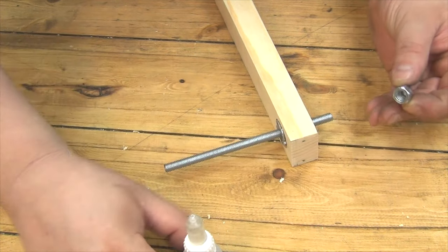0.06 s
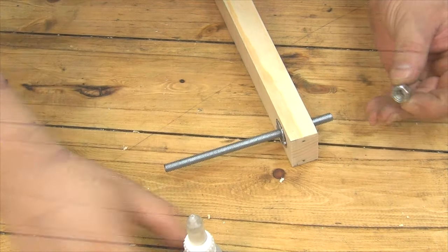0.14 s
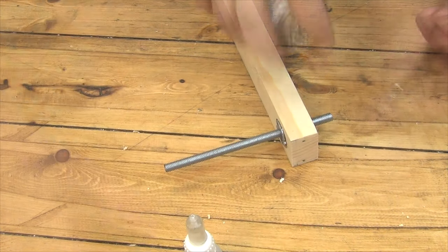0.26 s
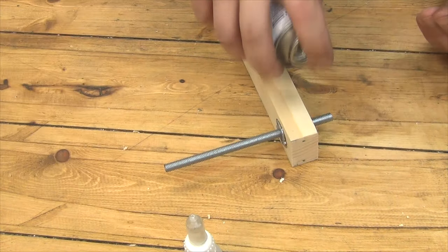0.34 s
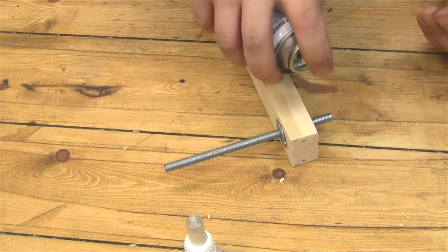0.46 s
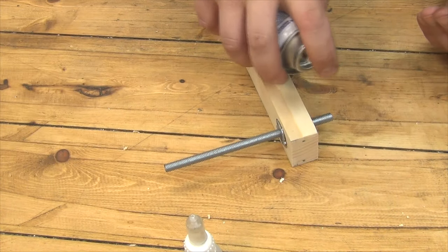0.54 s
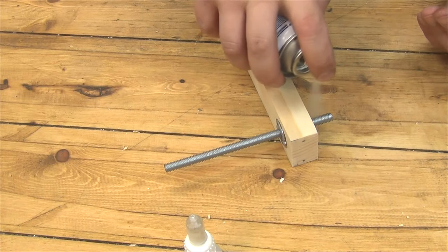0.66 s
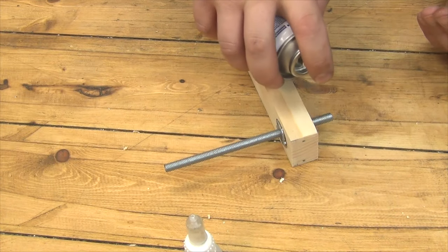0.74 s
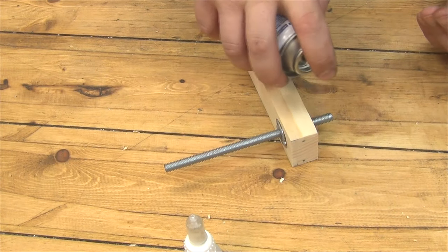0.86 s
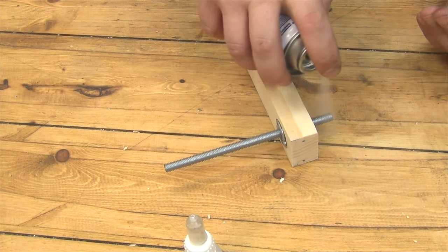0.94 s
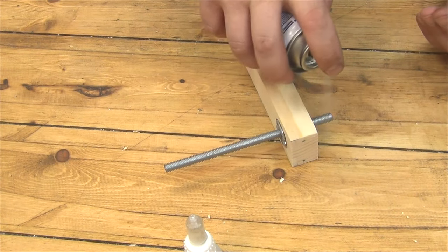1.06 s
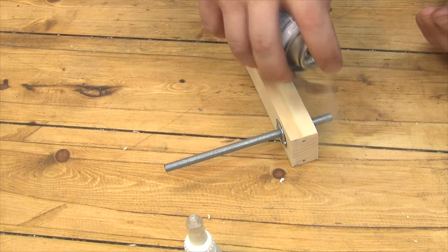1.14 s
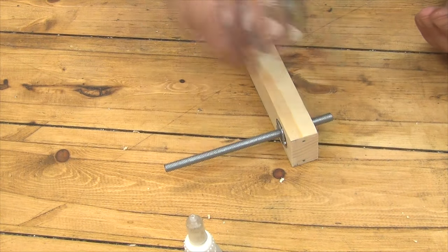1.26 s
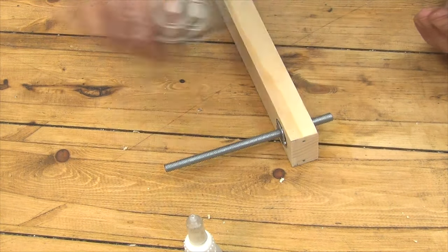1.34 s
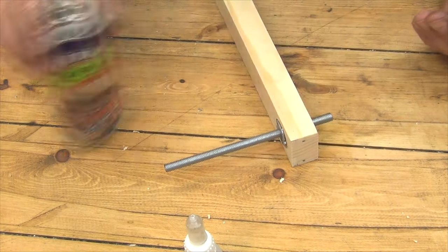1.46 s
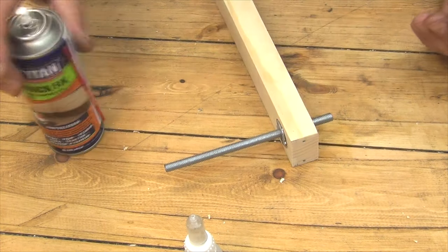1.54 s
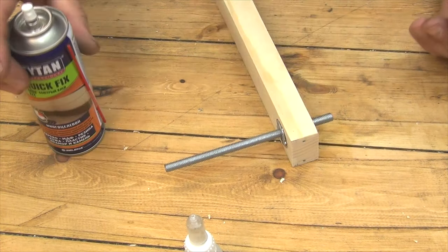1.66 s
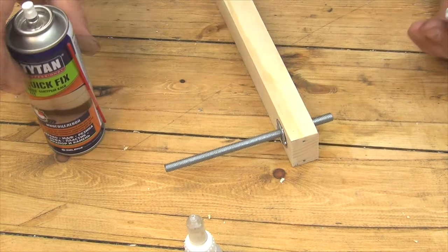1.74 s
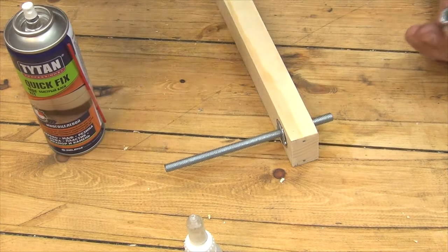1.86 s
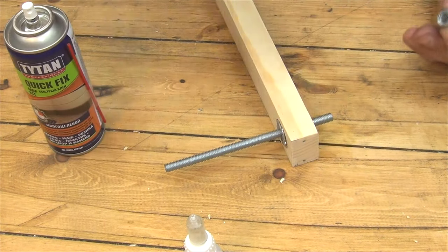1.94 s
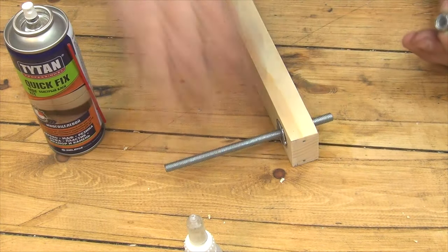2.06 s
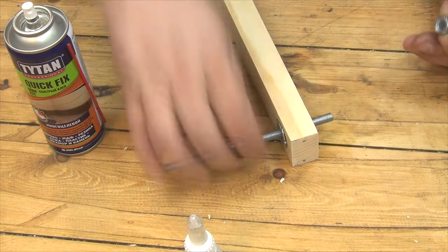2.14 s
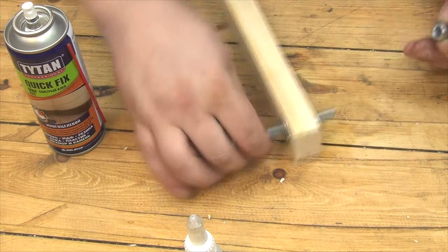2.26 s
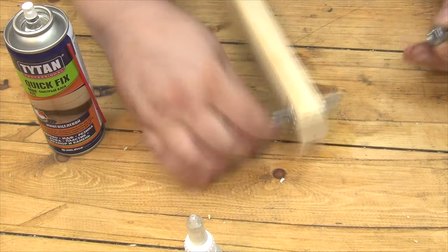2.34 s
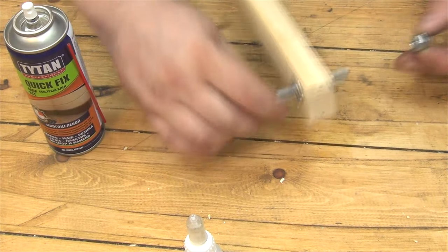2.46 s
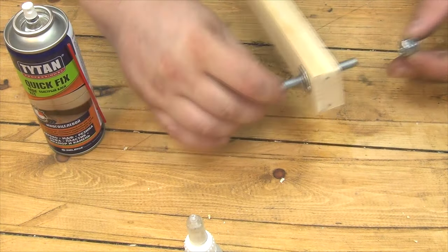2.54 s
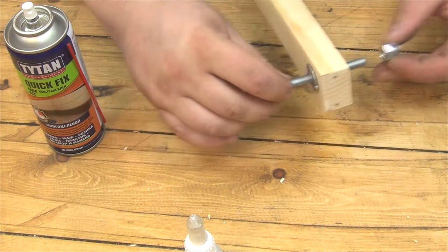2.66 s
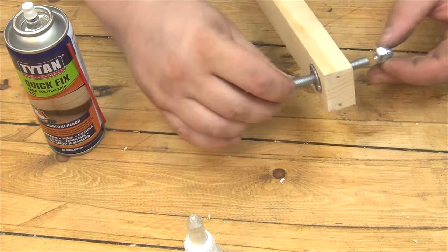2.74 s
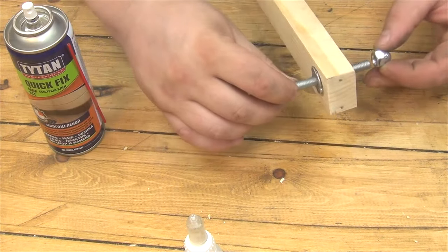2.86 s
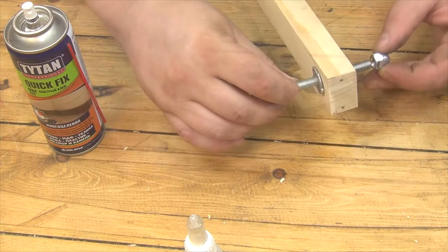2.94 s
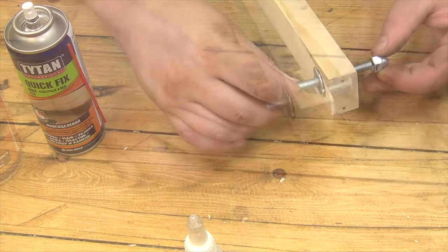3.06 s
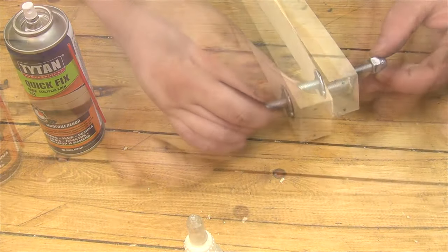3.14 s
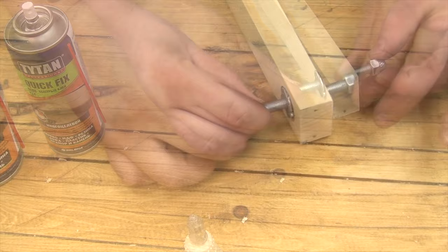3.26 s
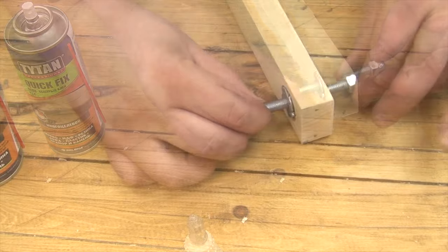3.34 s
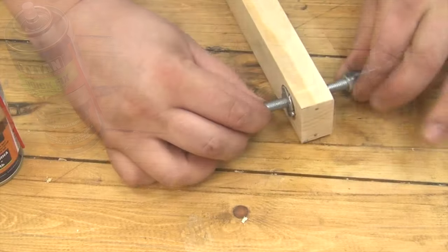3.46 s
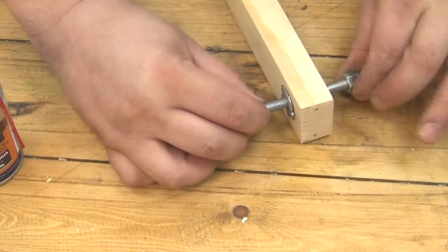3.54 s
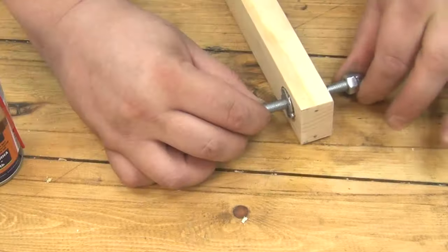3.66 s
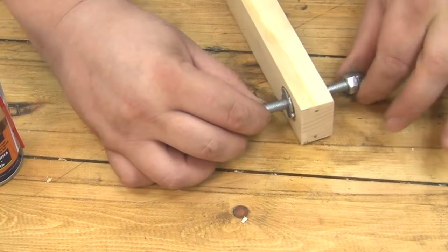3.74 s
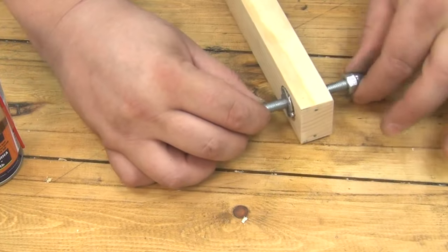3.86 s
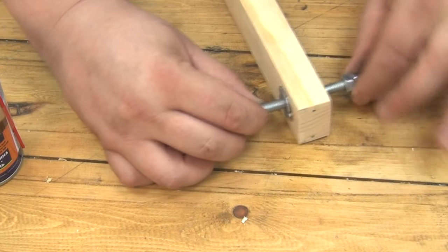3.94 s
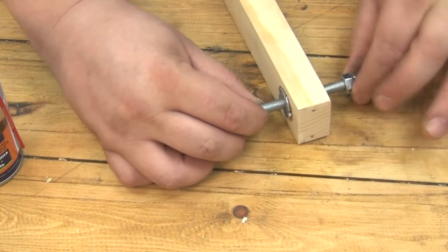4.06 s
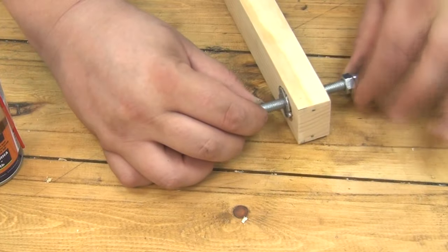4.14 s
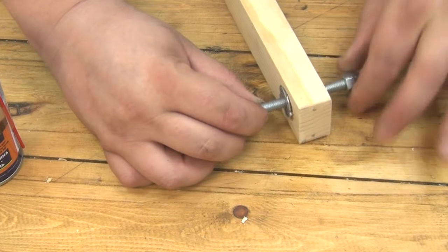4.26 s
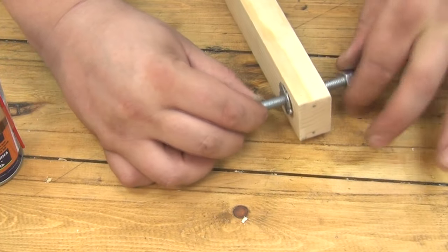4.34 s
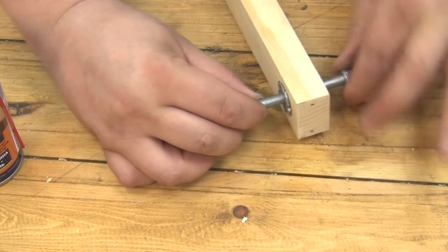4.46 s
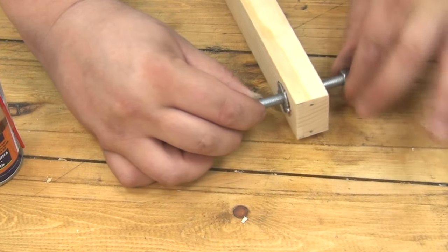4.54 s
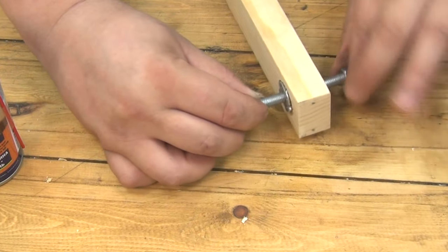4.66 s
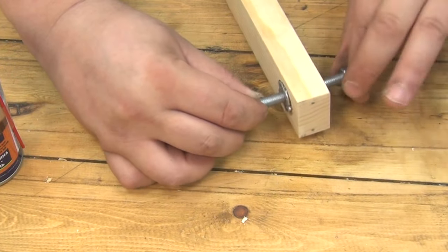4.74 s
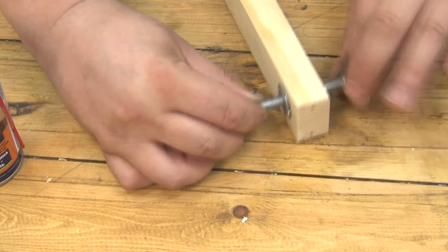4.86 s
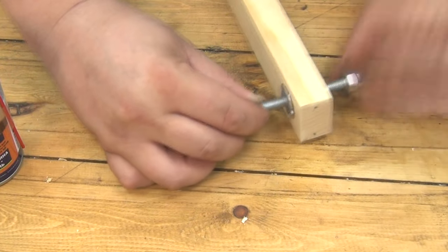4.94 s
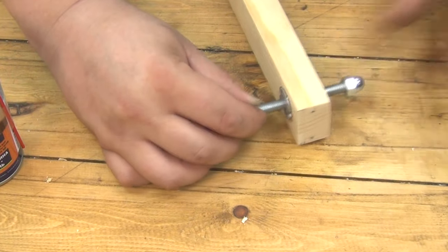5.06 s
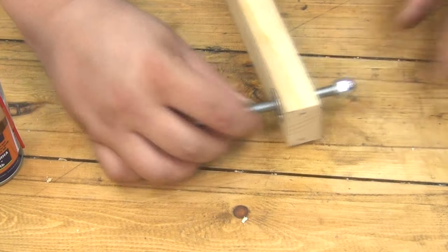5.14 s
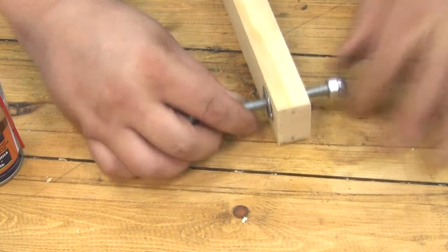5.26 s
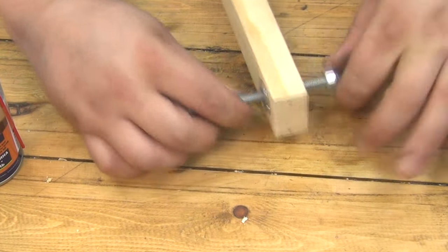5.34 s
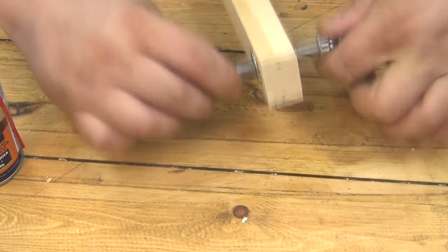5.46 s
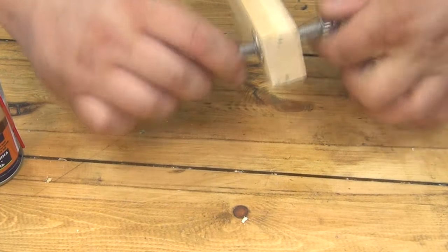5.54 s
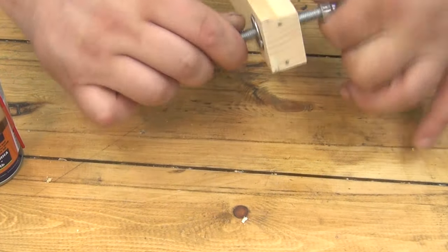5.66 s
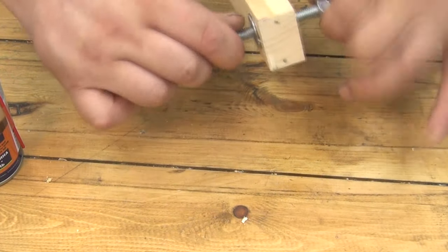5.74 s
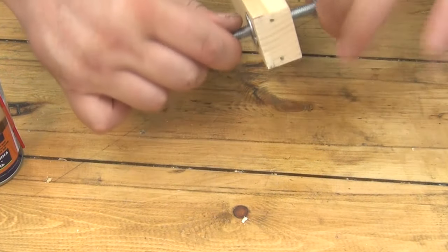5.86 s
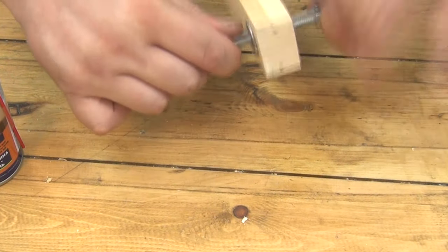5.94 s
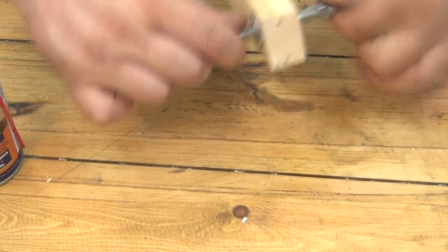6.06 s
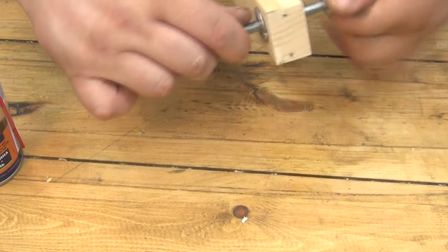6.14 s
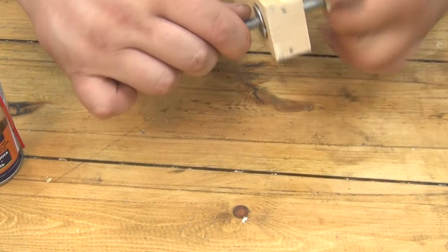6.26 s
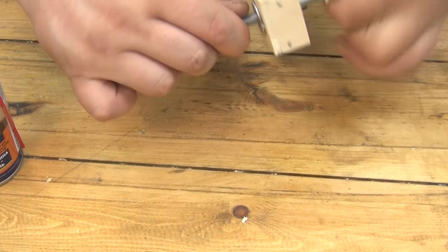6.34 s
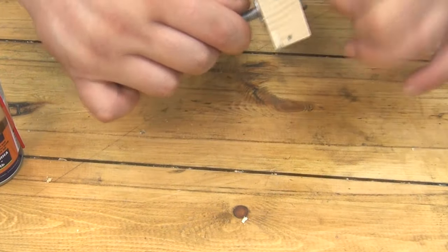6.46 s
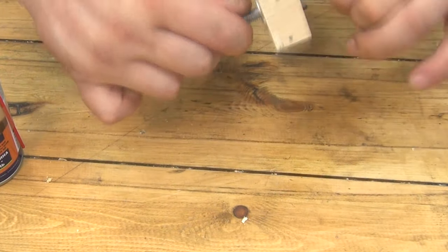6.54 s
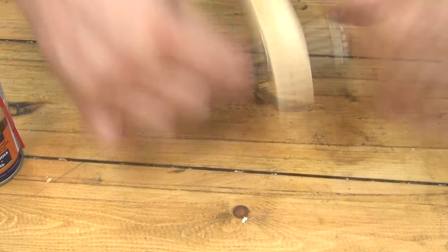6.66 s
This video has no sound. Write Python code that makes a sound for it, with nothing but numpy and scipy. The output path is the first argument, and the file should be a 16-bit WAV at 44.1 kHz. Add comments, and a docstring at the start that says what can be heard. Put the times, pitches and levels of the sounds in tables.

```python
"""A faint rustle of hands is heard first, then three short sprays of an aerosol can onto a wooden batten: turbulent
hiss, shaped by nozzle resonances and combed by a reflection. The can is set down on a plank floor and rocks: decaying
modes of can and boards. Fingers start a nut on the threaded rod in the batten: micro-impacts tick on steel, friction
noise rubs and squeaks, the batten knocks and loose washers chatter. A small dry room adds a short tail; a fan runs
faintly and a low hum comes and goes."""
import sys
import numpy as np
from scipy import signal
from scipy.fft import rfft, irfft, next_fast_len
from scipy.io import wavfile

SR = 44100
rng = np.random.default_rng(int(sys.argv[2]) if len(sys.argv) > 2 else 0)


def waveform_to_disk(signal):
    """Save audio, clipped to [-1, 1], as 16-bit WAV at the path in sys.argv[1]."""
    frames = np.transpose(np.atleast_2d(signal))
    scaled = np.clip(frames, -1, 1) * 32767
    samples = np.round(scaled).astype(np.int16)
    wavfile.write(sys.argv[1], SR, samples)


N = 295029
T = np.arange(N) / SR  # s
FREQ = np.arange(N // 2 + 1) * SR / N + 1e-6  # Hz, kept above zero for the logarithm

# valve presses: (t/s, length/s, level/dB, lag of the reflection off the batten/ms, reflection strength 0-1)
SPRAYS = [(0.432, .13, -50, 0.33, 0.4), (0.456, 0.036, -51, 0.33, 0.4), (0.648, 0.021, -23.5, 0.34, 0.08),
          (0.674, 0.11, -22.5, 0.33, 0.1), (0.922, 0.13, -22, 0.363, 0.25),
          (1.105, 0.095, -22.5, 0.37, 0.16)]
# spectrum of the jet's hiss: (f/Hz, relative level/dB)
JET_SPECTRUM = [(100, -39), (350, -25.5), (700, -21), (1100, -28.5), (2000, -21), (3000, -14), (4200, -19),
                (6500, -13), (7400, -1.5), (8200, -2.5), (9000, -6), (10300, -1.5), (11500, -10),
                (15800, -9)]
# narrow whistles of the nozzle: (f/Hz, width/Hz, level above the hiss/dB)
NOZZLE_WHISTLES = [(4800, 380, 5.5), (6000, 83, 4), (7180, 50, 4.5), (7660, 21, -0.5), (8060, 30, -0.5),
                   (8420, 55, 3.5), (8100, 50, 8), (9400, 22, 0), (8980, 37, 0), (9300, 30, 5),
                   (10300, 25, 0), (10400, 21, 5), (10530, 25, 0.5)]


def spray(attack_s=0.017, close_t60=0.075, flutter_db=1.14, scatter=0.13, lead_s=0.0071, dull_hz=9500,
          half_open_db=-40):
    """Jet noise and comb filtering: turbulence hisses while the valve is open and meets its own reflection."""
    whistles = abs(peaks(NOZZLE_WHISTLES))
    jet = filtered(noise(), slope(JET_SPECTRUM) * np.sqrt(1 + whistles ** 2))
    # hand, can and floor scatter the jet over a few ms and ripple its spectrum
    lags = rng.uniform(.001, .014, 14)
    treble = jet - lowpass(jet, 2500, order=1)  # small things throw back only short waves
    jet = jet + scatter * sum(np.roll(treble, int(lag * SR)) for lag in lags)
    # droplets make the flow uneven
    flutter = undb(flutter_db * unit(lowpass(noise(), 150)))
    jet = unit(jet) * flutter
    out, t = np.zeros(N), T[:SR // 2]
    hz = np.arange(len(t) // 2 + 1) * SR / len(t)
    for at, length, db, lag_ms, reflection in SPRAYS:
        hiss = jet[int(at * SR):][:len(t)]
        if db < half_open_db:  # a barely open valve gives a duller jet
            hiss = lowpass(hiss, dull_hz, order=1)
        delay = np.exp(-2j * np.pi * hz * lag_ms / 1000)
        echo = irfft(rfft(hiss) * delay, len(t))
        valve = np.clip(t / attack_s, 0, 1) * fade(np.maximum(t - length, 0), close_t60)
        # the flow sets in shortly before the tabled time
        add(out, at - lead_s, undb(db) * valve * unit(hiss + reflection * echo))
    return out


# body of the can: (f/Hz, relative level/dB, t60/s)
CAN_MODES = [(497, 0, 0.187), (522, -3, 0.17), (579, -0.5, 0.18), (760, -20, .12), (783, 3.5, 0.073),
             (882, -2, 0.096), (1002, 2.5, 0.096), (1096, -5, 0.088), (1267, 7, 0.042), (1280, -11, 0.13),
             (1610, -9.5, 0.094), (1844, -10, 0.077)]
CAN_AT_S, CAN_DB, CAN_ROCKING_S, RIM_GAP_S = 1.573, -27.5, 0.049, .0105


def can():
    """Modal radiation: each contact of the settling rim makes the part-full can clonk in its own modes."""
    out = np.zeros(N)
    for at, db in rocking(CAN_AT_S, CAN_DB, CAN_ROCKING_S, RIM_GAP_S):
        clonk = body(CAN_MODES, dense_db=7.5, dense_t60=0.1, low_hz=444, high_hz=1800)
        add(out, at, undb(db) * clonk)
    return out


# floorboards: (f/Hz, relative level/dB, t60/s)
BOARD_MODES = [(104.7, -11.5, 0.69), (161.5, 3.5, 0.27), (183, -9, 0.42), (208.5, 0.5, 0.22),
               (240.2, 4, 0.13), (293.8, -4, 0.26), (328, 1, 0.1), (371.5, -6, 0.18), (426, -11.5, 0.21),
               (483, -4, 0.16), (530.6, -4, 0.19), (623, 3, 0.15), (683, 6, 0.058)]
BOARD_PAN_DB, PAN_SCATTER_DB = -1, 1.5  # left minus right, and its spread from contact to contact


def boards(ring_db=-1, held_from_s=2.2, held_db=-6, thump_cycles=6, spread=2.01):
    """Contact-limited excitation: a blow thumps and rings chiefly the floorboard modes near its pitch."""
    ring = body(BOARD_MODES, dense_db=2.5, dense_t60=0.065, low_hz=172, high_hz=1170)
    out, t, start = np.zeros((2, N)), T[:len(ring)], SR // 50
    for at, db, hz in knocks():
        pan_db = BOARD_PAN_DB + PAN_SCATTER_DB * rng.standard_normal()
        # a band around the pitch of the blow shapes thump and ring
        band = signal.butter(2, [hz / spread, hz * spread], "bandpass", fs=SR, output="sos")
        thump = signal.sosfilt(band, np.sin(2 * np.pi * hz * t) * fade(t, thump_cycles / hz))
        modes = signal.sosfilt(band, ring)
        hand_db = held_db * (at > held_from_s)  # a hand on the batten weakens the ring
        modes_gain = undb(ring_db + hand_db) / np.std(modes[:start])
        blow = thump / np.std(thump[:start]) + modes_gain * modes
        blow = blow / np.std(blow[:start])
        for ear, sign in zip(out, (1, -1)):
            add(ear, at, undb(db + sign * pan_db / 2) * blow)
    return out


# a thing comes down on the boards and rocks to rest; a softer contact thumps lower:
# (t/s, level/dB, f of the first thump/Hz, rocking time/s)
LANDINGS = [(.001, -51, 380, 0.003), (1.554, -52, 165, .004), (1.576, -30, 302, 0.05),
            (1.664, -36.5, 260, 0.0049), (1.874, -52.5, 235, 0.0052), (2.416, -55.5, 313, 0.039),
            (3.273, -51, 676, 0.021), (4.345, -58.5, 198, 0.047), (4.975, -38.5, 414, 0.046),
            (5.037, -48, 720, 0.029), (5.313, -46.5, 235, 0.048), (6.138, -58.5, 268, 0.034)]
BOARD_GAP_S = .0095  # typical time between rocking contacts
FAR_EDGE_PITCH = 0.67  # every second contact is on the other edge and this much lower (ratio)
NUDGE_DB, NUDGE_HZ = 1.5, 195  # bump of the batten after a twist; level against the squeak


def knocks():
    """Repeated impact: (t/s, level/dB, f/Hz) of blows rocking edge to edge, and a bump after each twist."""
    blows = []
    for at, first_db, hz, length in LANDINGS:
        for k, (s, db) in enumerate(rocking(at, first_db, length, BOARD_GAP_S)):
            blows.append((s, db, hz * FAR_EDGE_PITCH ** (k % 2)))
    bumps = [(at + length, db + NUDGE_DB, NUDGE_HZ) for at, length, db in SQUEAKS]
    return blows + bumps


# nut and rod touch: (t/s, level/dB, contact length as t60/s)
NUT_TICKS = [(3.184, -49.5, 0.025), (3.242, -52.5, 0.017), (3.2475, -48, .012), (3.2545, -43.5, 0.025),
             (3.265, -39, 0.042)]
# resonances of the nut on the rod: (f/Hz, width/Hz, relative level/dB)
NUT_RESONANCES = [(1645, 190, 3.5), (2470, 220, 2), (2940, 1050, 3), (5500, 410, 6.5), (6800, 190, -6),
                  (7460, 200, -3)]


def nut():
    """Damped resonance: steel touches steel and rings the nut."""
    return ticks(NUT_TICKS, NUT_RESONANCES, top_hz=7960)


# fingers grab the rod: (t/s, level/dB, contact length as t60/s)
ROD_TICKS = [(2.2872, -42.5, 0.0047), (2.2897, -40.5, 0.0058), (5.101, -62, 0.009), (6.126, -56, 0.034),
             (6.178, -65, 0.0083)]
# resonances of the rod: (f/Hz, width/Hz, relative level/dB)
ROD_RESONANCES = [(1295, 240, -10.5), (2500, 740, 1.5), (6120, 2100, -3.5), (7380, 810, -1)]


def rod():
    """Damped resonance: grabbing fingers excite the rod."""
    return ticks(ROD_TICKS, ROD_RESONANCES, top_hz=9000)


# a hard landing shakes the rod and the washers hop: (t/s, level/dB, rattling time/s)
RATTLES = [(1.584, -33.5, 0.025), (4.983, -49, 0.028), (5.325, -50.5, 0.019)]
# resonances of the rattling washers, and the rod's narrow ring near 2.6 kHz:
# (f/Hz, width/Hz, relative level/dB)
RATTLE_RESONANCES = [(2590, 61, 4), (2950, 1300, -4.5), (4060, 760, -2.5), (5150, 710, -6.5),
                     (7000, 290, -3)]


def washers(hop_gap_s=0.0046):
    """Chatter: loose washers strike repeatedly, each hop a brief contact that also rings the rod."""
    hops = []
    for at, first_db, length in RATTLES:
        hops += [(s, db, .008) for s, db in rocking(at, first_db, length, hop_gap_s)]
    return ticks(hops, RATTLE_RESONANCES, top_hz=8500)


# the spray button clicks under the finger: (t/s, level/dB)
BUTTON_TICKS = [(.469, -46.5), (0.535, -44.5), (0.6035, -47), (1.445, -44), (1.477, -48.5)]
# resonances of the button: (f/Hz, width/Hz, relative level/dB)
BUTTON_RESONANCES = [(6400, 1100, -18.5), (7800, 550, -10.5)]


def button():
    """Damped resonance: micro-impacts under the finger excite the small, high-pitched button."""
    return ticks([(at, db, .035) for at, db in BUTTON_TICKS], BUTTON_RESONANCES, top_hz=9590)


# quick slides of a hand over rod and batten: (t/s, length/s, hiss on the metal/dB, rub on the wood/dB)
STROKES = [(0.126, 0.16, -62.5, -58), (1.217, 0.094, -53, -66), (1.305, 0.12, -56.5, -61.5),
           (2.294, 0.078, -52, -55.5), (2.363, 0.11, -56.5, -63), (2.584, .15, -64.5, -68),
           (6.123, 0.09, -60, -62.5)]
# the nut is twisted and its thread squeaks: (t/s, length/s, level/dB)
SQUEAKS = [(4.9, .04, -70), (5.44, 0.13, -68), (5.765, 0.03, -69), (5.962, 0.07, -63.5), (6.372, 0.11, -76),
           (6.531, 0.036, -63.5)]
# soft rustle of the hands: (t/s, level before the two offsets below/dB)
RUSTLE = [(0.0, -68), (0.41, -65.5), (1.45, -61.5), (1.58, -64), (2.21, -66), (2.56, -63), (2.76, -66.5),
          (3.71, -84), (4.96, -80), (5.21, -66.5), (5.83, -75.5), (6.3, -72.5), (6.68, -71)]
RUSTLE_DB, RUSTLE_WOOD_DB = -2.5, -2.5  # hiss against the rustle table; rub on the wood against that hiss
# resonances of rubbed wood, squeaking thread, and batten shifting on the boards:
# (f/Hz, width/Hz, relative level/dB)
SKIN_ON_WOOD = [(262, 67, 2), (460, 340, -3.5), (980, 550, 8), (1650, 230, -12), (2790, 980, -5)]
THREAD = [(2375, 110, 7.5), (2700, 180, -4), (5360, 180, -0.5)]
DRAG = [(172, 150, 0.5), (269, 110, 0.5)]
DRAG_DB = -3  # rumble of the shifted batten, against the rub on the wood


def fingers(catch_db=2.0):
    """Friction: skin catches and lets go on rod and batten, slides shift the batten, the turned nut squeaks."""
    metal, wood, turn = np.zeros((3, N))
    for at, length, metal_db, wood_db in STROKES:
        add(metal, at, undb(metal_db) * stroke(length, skew=0.58))
        add(wood, at, undb(wood_db) * stroke(length, skew=.6))
    for at, length, db in SQUEAKS:
        add(turn, at, undb(db) * stroke(length, skew=0.75))
    drag = undb(DRAG_DB) * wood * rub(DRAG, grain_db=3, top_hz=600)
    # between the slides the hands keep rustling softly
    rustle = undb(RUSTLE_DB + np.interp(T, *np.transpose(RUSTLE)))
    metal = np.hypot(metal, rustle)
    wood = np.hypot(wood, undb(RUSTLE_WOOD_DB) * rustle)
    grip = undb(catch_db * unit(lowpass(noise(), 19)))
    # the fine ridges of the thread stir mostly the upper resonances
    hiss = rub(ROD_RESONANCES, grain_db=1.5, top_hz=9200)
    hiss = unit(hiss - lowpass(hiss, 5500, order=1))
    wood_rub = rub(SKIN_ON_WOOD, grain_db=1.5, top_hz=4000)
    squeak = turn * rub(THREAD, grain_db=6, top_hz=6670)
    return grip * (metal * hiss + wood * wood_rub + drag) + squeak


def room(x, wet_db=-12, low_t60=0.25, high_t60=0.19, side_db=-5, side_top_hz=8500):
    """Diffuse reverberation: a short noise tail, duller as it fades; its side signal is low-passed."""
    t = T[:SR // 2]
    tails = []
    for _ in range(2):  # mid and side
        hiss = rng.standard_normal(len(t))
        low = lowpass(hiss, 1500, order=1)
        tail = low * fade(t, low_t60) + (hiss - low) * fade(t, high_t60)
        tail = tail * np.clip(t / 0.0061, 0, 1)
        tails.append(signal.fftconvolve(x, tail / np.sqrt(np.sum(tail ** 2)))[:N])
    side = undb(side_db) * lowpass(tails[1], side_top_hz, order=3)
    return undb(wet_db) * (tails[0] + side * np.array([[1], [-1]]))


# spectrum of the room tone: (f/Hz, relative level/dB)
ROOM_SPECTRUM = [(24, -28.5), (48, 4.5), (80, -0.5), (150, -5.5), (300, -10.5), (600, -14), (1000, -18.5),
                 (1500, -19.5), (3000, -18), (6000, -21), (11000, -25.5), (16000, -24)]
# soft resonances of the fan: (f/Hz, width/Hz, level above the room tone/dB)
FAN_RESONANCES = [(923.5, 25, 17), (1106, 88, 11.5)]
# side level of the background noise: (f/Hz, side minus mid/dB)
SIDE_LEVEL = [(30, -17), (70, -10), (150, -9), (400, -10), (900, -12), (2000, -28.5), (7000, -13),
              (12000, -28.5)]


def room_tone(level_db=-63.5, waver_db=1.0):
    """Stationary coloured noise: rumble, hiss and two fan resonances, with a side signal set by frequency."""
    fan = abs(peaks(FAN_RESONANCES))
    colour = undb(level_db) * unit(slope(ROOM_SPECTRUM) * np.sqrt(1 + fan ** 2))
    mid = filtered(noise(), colour)
    side = filtered(noise(), colour * slope(SIDE_LEVEL))
    waver = undb(waver_db * unit(lowpass(noise(), 18)))
    return (mid + side * np.array([[1], [-1]])) * waver


def hum(start=3.45, end=4.2, hz=160.0, db=-71):
    """Pure tone under an envelope: a faint low hum comes and goes."""
    swell = np.clip(np.minimum(T - start, end - T) / 0.076, 0, 1)
    return undb(db) * swell * unit(np.sin(2 * np.pi * hz * T))


def body(modes, dense_db, dense_t60, low_hz, high_hz):
    """Modal synthesis: main modes over a dense, decaying crowd of others; rms 1 over the first 20 ms."""
    t, start = T[:SR // 2], SR // 50
    ring = np.zeros(len(t))
    for k, (hz, db, t60) in enumerate(modes):
        ring += undb(db) * fade(t, t60) * np.sin(2 * np.pi * hz * t) * (-1) ** k  # polarity alternates
    crowd = lowpass(rng.standard_normal(len(t)), high_hz, order=6)
    crowd = unit(crowd - lowpass(crowd, low_hz, order=1)) * fade(t, dense_t60)
    ring = ring / np.std(ring[:start]) + undb(dense_db) * crowd
    return ring / np.std(ring[:start])


def rocking(at, db, length, gap, count=10, gap_scatter=.25, settle_db=10.5):
    """Energy loss in settling: (t/s, level/dB) of uneven contacts, firm at first, settle_db down at length."""
    gaps = gap * np.exp(gap_scatter * rng.standard_normal(count))
    times = np.cumsum(gaps) - gaps
    return [(at + s, db - settle_db * min(s / length, 3) ** 2) for s in times]


def ticks(rows, resonances, top_hz):
    """Impulsive excitation: brief bursts of micro-impacts ring damped resonances."""
    out, t = np.zeros(N), T[:SR // 10]
    for at, db, t60 in rows:
        burst = unit(rng.standard_normal(len(t)) * fade(t, t60)) / np.sqrt(len(t))  # energy 1
        add(out, at, undb(db) * np.sqrt(SR / 200) * burst)  # energy of 5 ms at rms 1
    response = peaks(resonances)
    response = response / np.sqrt(np.mean(abs(response) ** 2))
    return lowpass(filtered(out, response), top_hz, order=6)


def rub(resonances, grain_db, top_hz):
    """Friction noise: a dense stream of uneven slips through the resonances of the surface."""
    slips = noise() * undb(grain_db * unit(lowpass(noise(), 250)))
    return unit(lowpass(filtered(slips, peaks(resonances)), top_hz, order=6))


def stroke(length, skew):
    """Kinematics of a finger movement: its speed is quick to rise, slower to die away."""
    return np.sin(np.pi * np.linspace(0, 1, int(length * SR)) ** skew)


def undb(db):
    """Logarithmic level: decibels to amplitude gain."""
    return 10 ** (np.asarray(db) / 20)


def unit(x):
    """Effective value: scale to rms 1."""
    return x / np.sqrt(np.mean(x ** 2))


def noise():
    """Flat spectrum: white noise for the whole scene."""
    return rng.standard_normal(N)


def filtered(x, response):
    """Linear filtering: multiply the spectrum by a response, zero-padded at the end."""
    size = next_fast_len(N + SR // 4)
    hz = np.arange(size // 2 + 1) * SR / size
    return irfft(rfft(x, size) * np.interp(hz, FREQ, response), size)[:N]


def slope(points):
    """Spectral envelope: response through (f/Hz, level/dB) points on a logarithmic frequency axis."""
    hz, db = np.transpose(points)
    return undb(np.interp(np.log(FREQ), np.log(hz), db))


def peaks(rows):
    """Parallel resonators: summed response of (f/Hz, width/Hz, level/dB) rows."""
    return sum(undb(db) / (1 + 1j * (FREQ ** 2 - hz ** 2) / (FREQ * width)) for hz, width, db in rows)


def lowpass(x, hz, order=2):
    """Maximally flat (Butterworth) low-pass."""
    return signal.sosfilt(signal.butter(order, hz, fs=SR, output="sos"), x)


def fade(t, t60):
    """Exponential decay: 60 dB down after t60."""
    return undb(-60 * t / t60)


def add(track, at, sound):
    """Superposition: mix a sound into a track at a time in s."""
    i = int(at * SR)
    track[i:i + len(sound)] += sound[:N - i]


def scene():
    """Superposition of direct sound, reverberation and background; the handling sits slightly to the right."""
    near = spray() + can() + nut() + rod() + washers() + button() + fingers()
    near = near * undb(np.array([[-.25], [.25]]))  # left, right
    direct = near + boards()
    return direct + room(direct.mean(axis=0)) + room_tone() + hum()


def record(dry, top_hz=15800):
    """Band limitation: the recorder cuts the top with a steep elliptic low-pass."""
    return signal.sosfilt(signal.ellip(12, .2, 80, top_hz, fs=SR, output="sos"), dry)


dry = scene()
out = record(dry)
waveform_to_disk(out)
```